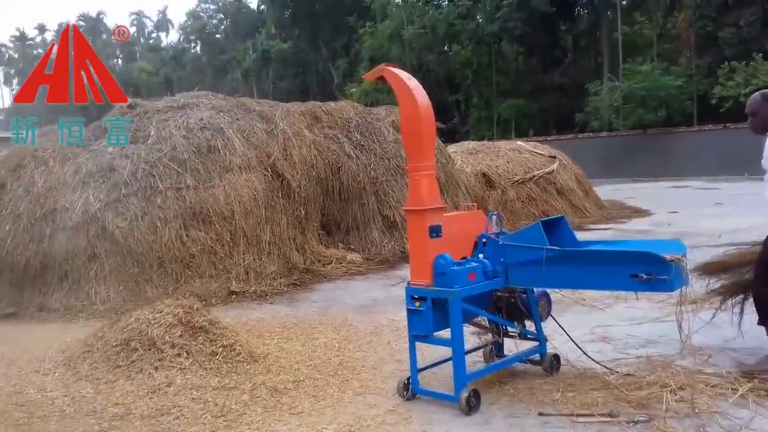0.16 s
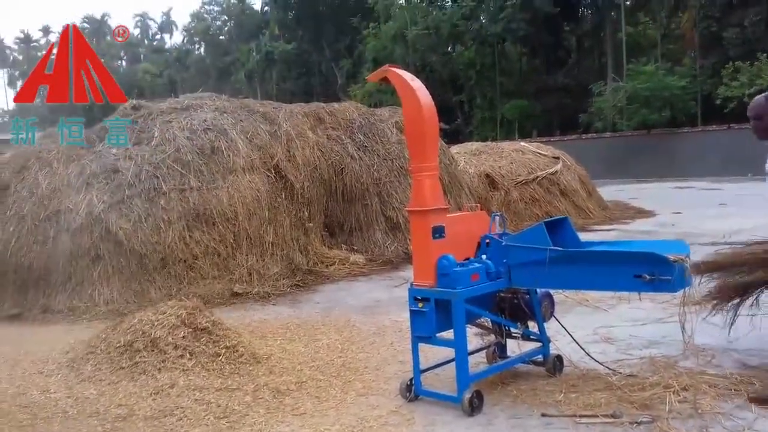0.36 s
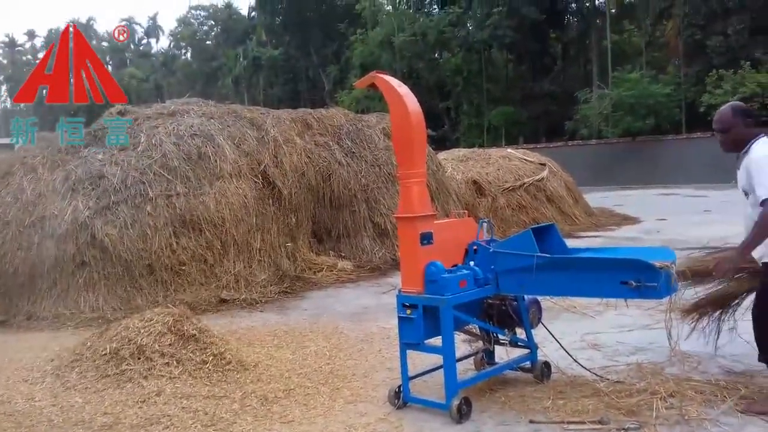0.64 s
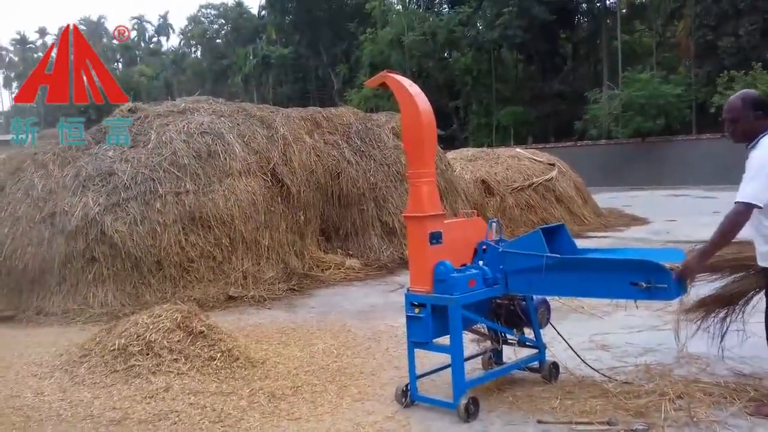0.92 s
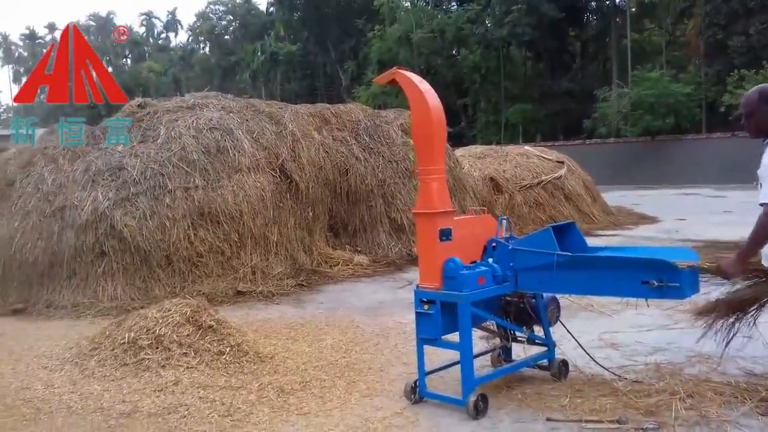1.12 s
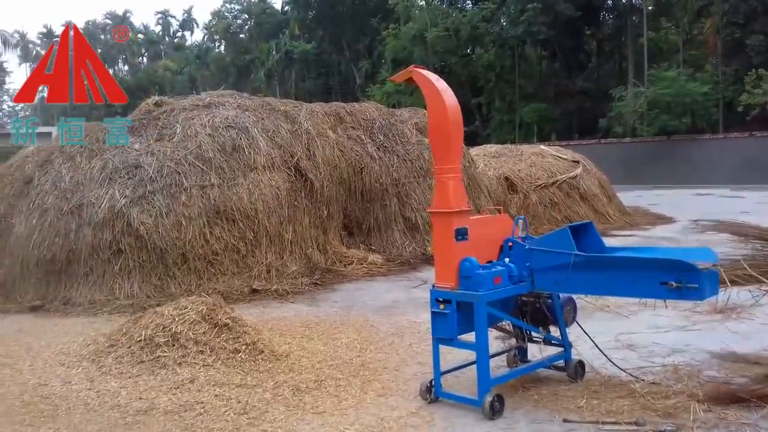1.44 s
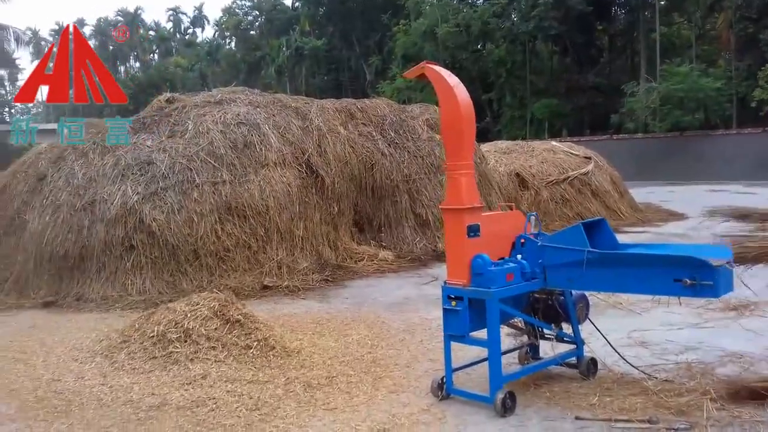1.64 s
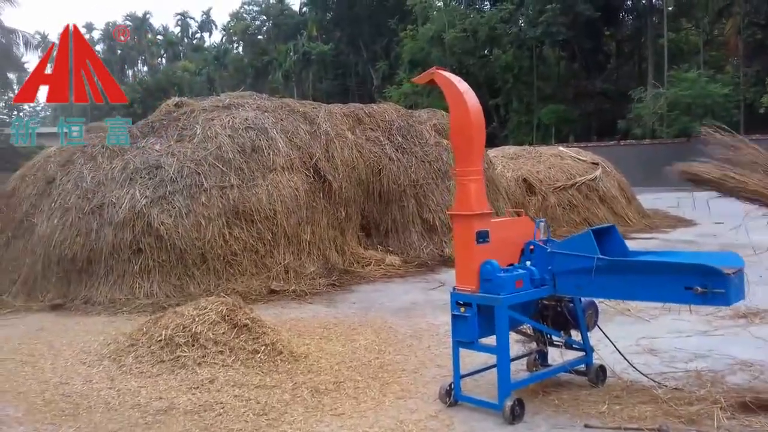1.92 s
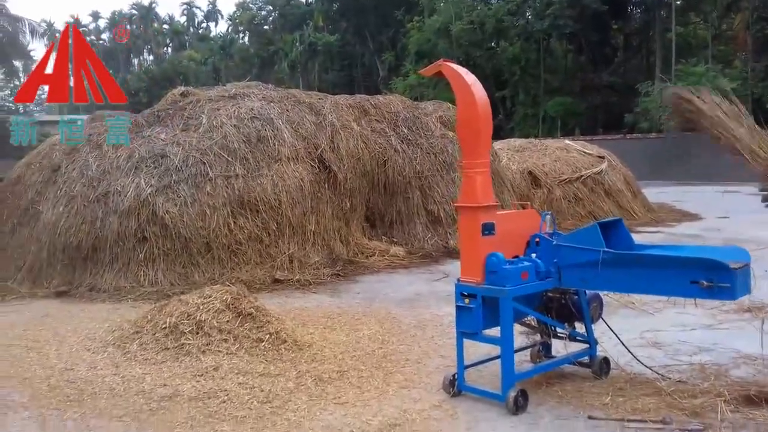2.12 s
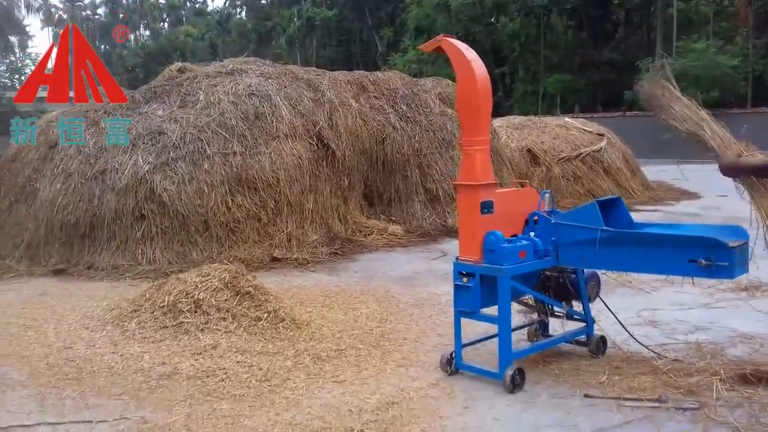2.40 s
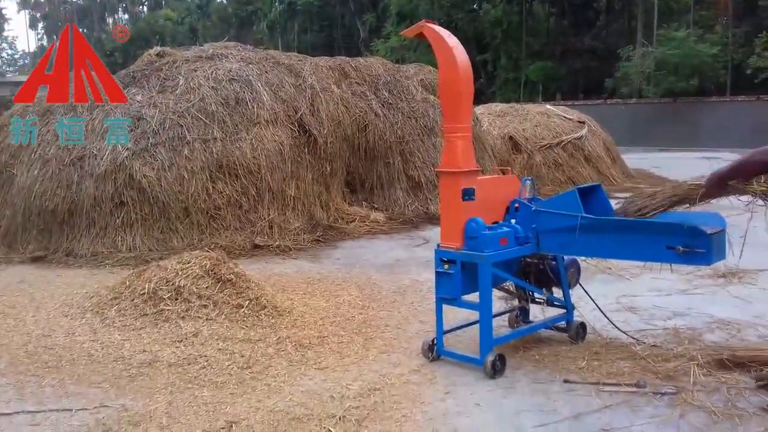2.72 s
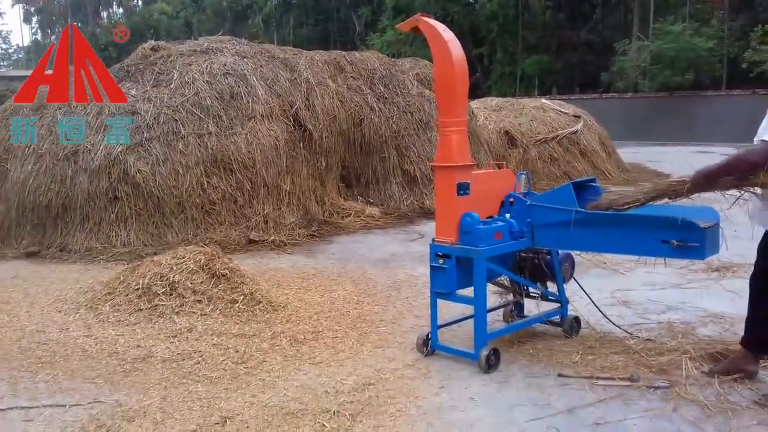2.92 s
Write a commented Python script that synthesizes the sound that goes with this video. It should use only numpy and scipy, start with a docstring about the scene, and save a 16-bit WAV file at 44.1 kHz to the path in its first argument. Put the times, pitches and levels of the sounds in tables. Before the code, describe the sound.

Motor-driven straw chopping machine already running and never stopping: rushing air, gear and chain clatter, low hum, rough high ringing and scattered metallic pings, close outdoor phone pickup, dry and bright.

```python
"""Straw chopper running empty

A motor-driven straw chopper runs empty in an open yard, a few metres from a phone.
The rotor hums as sines on its shaft orders; the blower hisses in filtered noise; gears and chain rattle
the sheet-metal body, random impacts into resonators, swelling about three times a second.
A loose steel part rings near 5 kHz under gear teeth and small knocks, with single pings beside it."""
import sys
import numpy as np
from scipy import signal
from scipy.fft import rfft, irfft
from scipy.io import wavfile
from scipy.ndimage import uniform_filter1d

SR = 44100
rng = np.random.default_rng(int(sys.argv[2]) if len(sys.argv) > 2 else 0)


def level_to_linear(level):
    """Convert decibel levels to linear amplitude factors, elementwise."""
    exponent = np.asarray(level, float) / 20
    return 10 ** exponent


def waveform_to_disk(signal):
    """Save audio, clipped to [-1, 1], as 16-bit WAV at the path in sys.argv[1]."""
    frames = np.transpose(np.atleast_2d(signal))
    scaled = np.clip(frames, -1, 1) * 32767
    samples = np.round(scaled).astype(np.int16)
    wavfile.write(sys.argv[1], SR, samples)


N = 134946
SHAFT_HZ, TEETH = 14.9, 15  # mean shaft speed; gear teeth per turn


def level(x, db):
    """Normalisation: scale a signal to an rms level in dB."""
    return x * level_to_linear(db) / np.sqrt(np.mean(x ** 2))


def curve(rows, col=1):
    """Linear interpolation: a table column joined by straight lines in time."""
    a = np.array(rows)
    return np.interp(np.arange(N) / SR, a[:, 0], a[:, col])


def about_mean(rows):
    """Modulation in dB: a level curve with its mean removed."""
    db = curve(rows)
    return db - db.mean()


def over_hz(rows, hz):
    """Logarithmic pitch scale: a table read on a log-frequency axis."""
    a = np.array(rows)
    return np.interp(np.log(hz), np.log(a[:, 0]), a[:, 1])


def walk(rate):
    """Random modulation: levels held 1 / rate s and smoothed twice; spread near 1."""
    hold = int(SR / rate)
    steps = np.repeat(rng.standard_normal(N // hold + 1), hold)
    return 1.09 * uniform_filter1d(uniform_filter1d(steps, hold), hold)[:N]


def mode(x, hz, t60):
    """Damped resonance: a two-pole filter whose ring falls 60 dB in t60 seconds."""
    r = np.exp(-np.log(1000) / (t60 * SR))
    return signal.lfilter([1, 0, -1], [1, -2 * r * np.cos(2 * np.pi * hz / SR), r * r], x)


def clicks(rate, spread):
    """Random impact process: rate hits per second, a few much larger than the rest; rms 1."""
    when, rank, sign = rng.random((3, N))
    size = 10 ** (-spread * np.log(rank + 0.015) / 20) * np.sign(sign - 0.5)
    return level((when < rate / SR) * size, 0)


def excite():
    """Broadband excitation: rattling impacts mixed by power with the noise of rushing air."""
    rattle_share = 0.49
    air = rng.standard_normal(N)
    return np.sqrt(rattle_share) * clicks(2500, 2.73) + np.sqrt(1 - rattle_share) * air


def shaft():
    """Phase accumulation: turns of the rotor shaft, slightly wavering in speed."""
    return np.cumsum(SHAFT_HZ * (1 + 0.00089 * walk(2))) / SR


# swell of the rattle, used about its mean: start_s, level_db
RATTLE_SWELL = [(0.0, -18.5), (0.01, -25), (0.16, -26), (0.19, -25.5), (0.3, -21), (0.36, -28.5),
                (0.47, -29.5), (0.54, -22), (0.82, -28.5), (0.93, -19.5), (0.95, -25), (1.04, -29.5),
                (1.17, -25.5), (1.21, -21), (1.22, -24), (1.45, -27), (1.47, -24), (1.69, -29.5),
                (1.87, -23), (1.99, -30.5), (2.17, -22.5), (2.31, -32.5), (2.33, -25), (2.49, -23),
                (2.61, -29), (2.81, -23), (2.84, -24.5), (3.01, -25.5), (3.02, -20), (3.06, -20.5)]


def rattle_swell():
    """Amplitude modulation: the common rise and fall of the rattle in dB."""
    return about_mean(RATTLE_SWELL)


# share of the swell in dB that each register follows: pitch_hz, share
REGISTER_SHARE = [(100, 0.15), (700, 0.32), (1800, 0.54), (3500, 0.72), (8000, 0.75)]


def swell_share(hz):
    """Frequency-dependent modulation: the share of the swell followed at a frequency."""
    return over_hz(REGISTER_SHARE, hz)


# broad relative colour of body and air: pitch_hz, level_db (per Hz)
ROAR_COLOUR = [(25, -51), (48, -50), (75, -33), (100, -30.5), (130, -26), (200, -14), (330, -14.5),
               (480, -12.5), (560, -6), (900, -17), (1300, -8.5), (1750, -10.5), (2250, -6.5), (2600, -29),
               (3300, -16.5), (4000, -10.5), (4900, -19.5), (6200, -17.5), (7800, -14.5), (9000, -12.5),
               (10000, -17), (11500, -27.5), (13500, -32.5), (16000, -42)]


def roar(swell, turns):
    """Band-wise modulated noise: octaves follow the swell, flicker and, most in the treble, grind with the teeth."""
    f = np.maximum(np.arange(N // 2 + 1) * SR / N, 10)
    spectrum = rfft(level(excite(), 0)) * level_to_linear(over_hz(ROAR_COLOUR, f))
    grit_db = 1.2 * np.sin(2 * np.pi * TEETH * turns)
    common_db = swell + 2.0 * walk(24.74) + grit_db
    out = 0
    for octave in range(10):
        hz = 31.25 * 2 ** octave
        window = np.cos(np.pi / 2 * np.clip(np.log2(f / hz), -1, 1)) ** 2
        db = swell_share(hz) * common_db + 0.24 * walk(8.9)
        out = out + irfft(spectrum * window, N) * level_to_linear(db)
    return level(out, -19)


# shaft orders that sound: order (multiples of the shaft speed)
SHAFT_ORDERS = [4, 12, 14, 15, 16]
# level of each order before its waver: level_db (rms)
SHAFT_ORDERS_DB = [-66, -59, -47, -39.5, -40.5]


def rotor(turns):
    """Harmonic synthesis: sines locked to the shaft orders, slightly wavering in level."""
    out = 0
    for order, db in zip(SHAFT_ORDERS, SHAFT_ORDERS_DB):
        tone = np.sin(2 * np.pi * (order * turns + rng.random()))
        out = out + np.sqrt(2) * level_to_linear(db + 1.2 * walk(9.6)) * tone
    return out


# panel modes of the housing, levels before the low cut: pitch_hz, level_db (rms), t60_s
PANEL_MODES = [(118.4, -37, 0.66), (346.2, -39.5, 0.76), (382.4, -38, 0.14), (632, -36, 0.031),
               (654, -25.5, 0.049), (715, -25.5, 0.057), (769, -26.5, 0.089), (796, -26, 0.13),
               (949, -35.5, 0.063), (1111, -33.5, 0.11), (1488, -26, 0.035), (1552, -29, 0.06),
               (1935, -27, 0.036), (2078, -27.5, 0.06), (3920, -40, 0.0095), (4595, -35, .04),
               (8680, -37, 0.015)]
# boom of the low panels, used about its mean: start_s, level_db
PANEL_BOOM = [(0.0, -17), (0.09, -18.5), (0.12, -24.5), (0.29, -16), (0.41, -24.5), (0.44, -20.5),
              (0.54, -25.5), (0.55, -19), (1.14, -21.5), (1.16, -14), (1.23, -20.5), (1.77, -21),
              (1.8, -17), (1.99, -22.5), (2.21, -17), (2.3, -24.5), (2.42, -19.5), (3.06, -19)]


def housing(swell):
    """Modal synthesis: rattles throbbing with shaft and blades ring the panels; low ones boom together."""
    turn = 2 * np.pi * SHAFT_HZ * np.arange(N) / SR
    blade_turn = SHAFT_ORDERS[0] * turn + walk(2.83)
    throb = level_to_linear(0.6 * np.sin(turn) + 1.0 * np.sin(blade_turn))
    common = excite()
    boom = 0.75 * about_mean(PANEL_BOOM)
    out = 0
    for hz, db, t60 in PANEL_MODES:
        drive = (common + 1.08 * rng.standard_normal(N)) * throb
        motion_db = boom if hz < 900 else swell_share(hz) * swell
        out = out + level(mode(drive, hz, t60) * level_to_linear(motion_db + 1.0 * walk(20)), db)
    return signal.sosfilt(signal.butter(3, 220, "high", fs=SR, output="sos"), out)


# single knocks that ring one mode on its own: start_s, level_db (peak), pitch_hz
PING_KNOCKS = [(0.209, -13.5, 3418), (0.2653, -23, 10253), (0.2912, -19, 3418), (0.9911, -21, 3418),
               (1.1952, -17.5, 3418), (1.4666, -20, 10253), (1.4803, -21, 3418), (1.5454, -22, 10253),
               (1.6217, -25, 10253), (1.8143, -29, 10253), (2.015, -19, 10253), (2.1495, -23, 10253),
               (2.3253, -24, 10253), (2.383, -26, 10253), (2.5287, -25, 10253), (2.6544, -31, 3418),
               (2.79, -24, 10253), (2.8968, -22, 10253), (3.0091, -27, 10253)]


def pings():
    """Impulse response: each single knock starts one short metallic ring."""
    out = 0
    for start, db, hz in PING_KNOCKS:
        # the resonator peaks at twice its impulse
        knock = level_to_linear(db) / 2 * (np.arange(N) == int(start * SR))
        out = out + mode(knock, hz, 0.08)
    return out


def teeth(turns):
    """Gear meshing: one tap per tooth, sign and size wandering so the ring stays rough, not tonal; rms 1."""
    wander = np.tanh(2 * walk(140))
    taps = np.diff(np.floor(TEETH * turns), prepend=0) * wander
    return level(taps * level_to_linear(4 * rng.standard_normal(N)), 0)


# modes of the loose part: pitch_hz, t60_s
LOOSE_MODES = [(5105, 0.036), (5205, 0.032), (5270, 0.03), (5350, 0.032), (10253, 0.05)]
# level of each mode over time: start_s, then level_db (rms) for each mode in turn
LOOSE_MODES_DB = [(0, -21.5, -38, -35, -25, -48), (.28, -20, -39, -36, -25.5, -44),
                  (.7, -24, -34, -29, -27.5, -39), (1.0, -26, -29, -27.5, -25.5, -39),
                  (1.42, -25, -29, -26, -36, -38), (1.52, -27, -21.5, -26.5, -46, -34),
                  (1.85, -29, -21.5, -34.5, -44, -33.5), (2.3, -24.5, -21, -27, -31, -37),
                  (2.7, -25, -21.5, -33, -36, -36), (3.06, -22, -20, -26, -40, -36.5)]
# stronger knocks, relative to one another: start_s, level_db (peak)
LOOSE_KNOCKS = [(0.2603, -2), (0.392, -3), (0.9234, -2), (0.9744, -6), (1.0055, -8), (1.377, -2),
                (1.4086, -4), (1.6217, -3), (1.6788, -7), (1.8113, -10), (1.847, -14), (1.892, -6),
                (1.977, -12), (2.1323, -5), (2.2666, -3.5), (2.411, -2), (2.5157, -13), (2.5451, -4),
                (2.6333, -13), (2.68, -12), (2.8983, -10), (3.0051, -7)]
# how hard the part is shaken, used about its mean: start_s, level_db
LOOSE_SHAKE = [(0.0, -21), (0.33, -20.5), (0.38, -32), (0.4, -15), (0.46, -33), (0.48, -19.5), (0.71, -23),
               (0.73, -28.5), (0.83, -19.5), (0.91, -26), (0.93, -19), (0.95, -27), (1.12, -28.5),
               (1.21, -19), (1.22, -24), (1.6, -26.5), (1.63, -22), (1.65, -31), (1.69, -23), (1.7, -26.5),
               (1.87, -12.5), (1.95, -25), (2.01, -14), (2.09, -24), (2.13, -18.5), (2.24, -25),
               (2.27, -13.5), (2.33, -21), (2.63, -19), (2.65, -22), (2.72, -14.5), (2.76, -32),
               (2.79, -15.5), (2.87, -23.5), (2.93, -17), (2.95, -26), (3.02, -21.5), (3.06, -33)]
# strength of the gear-tooth taps over the random taps: start_s, level_db
TOOTH_STRENGTH = [(0, 5), (.7, 8), (1.55, 8), (1.8, 3), (3.06, 2)]


def loose_part(turns):
    """Impact-driven modes: teeth, stray taps and clear knocks ring a small steel part, building up in a few ms."""
    taps_per_s, tap_spread, knock_db = 800, 2.8, 41  # knock_db lifts the knocks over the rms-1 taps
    shake = level_to_linear(0.68 * about_mean(LOOSE_SHAKE))
    hits = (clicks(taps_per_s, tap_spread) + level_to_linear(curve(TOOTH_STRENGTH)) * teeth(turns)) * shake
    for start, db in LOOSE_KNOCKS:
        hits[int(start * SR)] += level_to_linear(db + knock_db)
    out = 0
    for k, (hz, t60) in enumerate(LOOSE_MODES):
        own_taps = 0.98 * shake * clicks(taps_per_s, tap_spread)
        drive = (hits + own_taps) * level_to_linear(1.2 * walk(60.56))
        ring = mode(mode(drive, hz, t60), hz, 0.0088)  # the second, short resonance softens the onset
        out = out + level(ring, 0) * level_to_linear(curve(LOOSE_MODES_DB, col=k + 1))
    return out


def scene():
    """Superposition: all sources add at one point, alike in both channels."""
    swell, turns = rattle_swell(), shaft()
    mono = roar(swell, turns) + housing(swell) + loose_part(turns) + pings() + rotor(turns)
    return np.array([mono, mono])


def band_limit(x):
    """A steep low-pass at the top of the band."""
    return signal.sosfilt(signal.butter(12, 15700, fs=SR, output="sos"), x)


def record(dry):
    """Saturation and port resonance: peaks are rounded; two microphone ports differ, faintly elsewhere in the treble."""
    ceiling = 1.15
    port_hz, port_width_hz = 8100, 2300  # width of each of three cascaded filters
    mid = ceiling * np.tanh(dry.mean(axis=0) / ceiling)
    edges = [port_hz - port_width_hz / 2, port_hz + port_width_hz / 2]
    port = signal.butter(1, edges, "band", fs=SR, output="sos")
    band = signal.sosfilt(np.tile(port, (3, 1)), mid)
    treble = signal.sosfilt(signal.butter(2, [4700, 5800], "band", fs=SR, output="sos"), mid)
    # the treble is shifted by 300 samples to loosen it from the middle
    side = level_to_linear(-29.5) * np.roll(treble, 300) - level_to_linear(-8) * band
    mix = 1.016 * np.array([mid + side, mid - side])
    return band_limit(mix)


dry = scene()
out = record(dry)
waveform_to_disk(out)
```